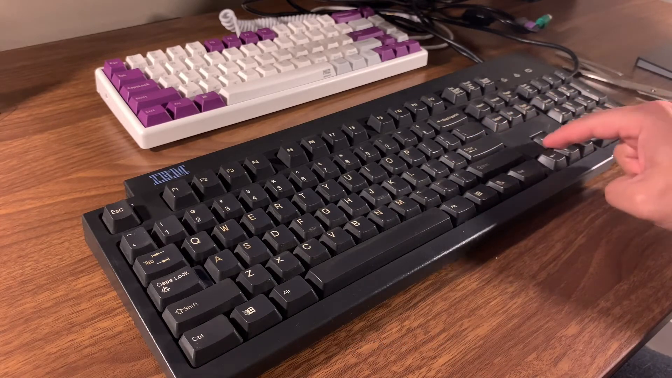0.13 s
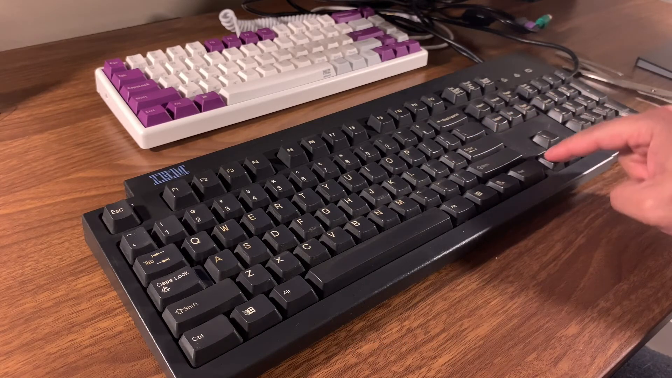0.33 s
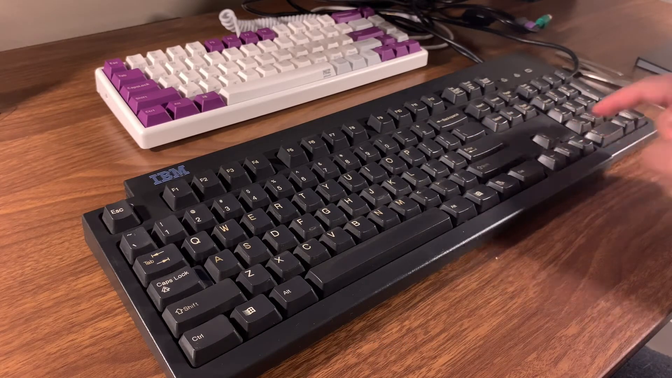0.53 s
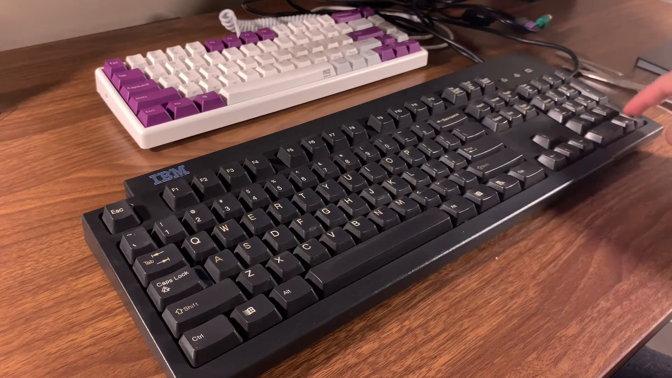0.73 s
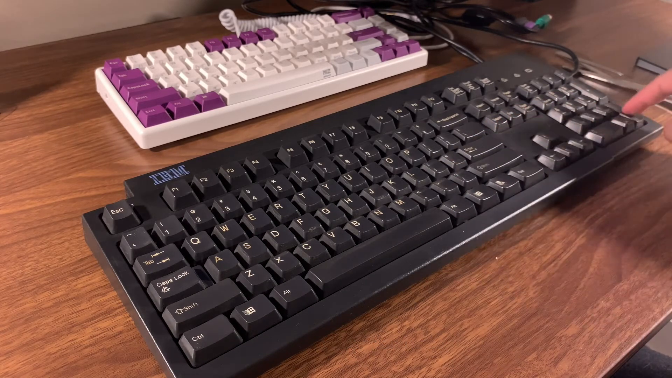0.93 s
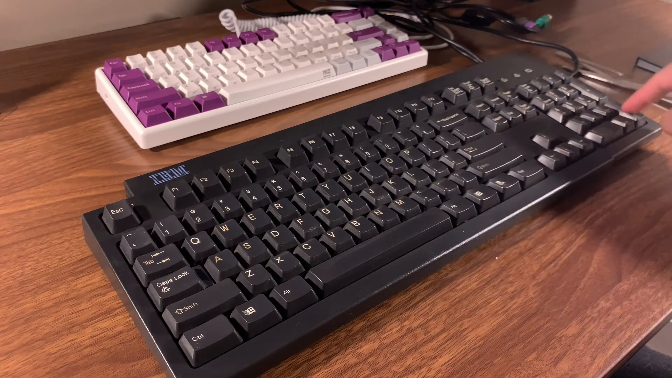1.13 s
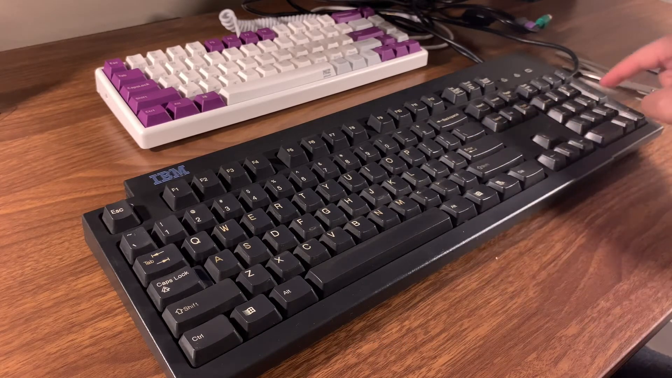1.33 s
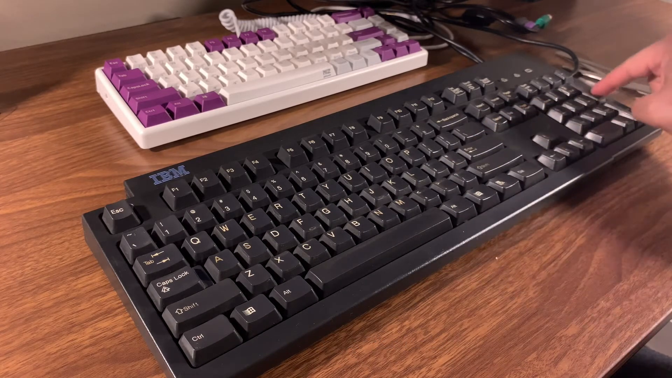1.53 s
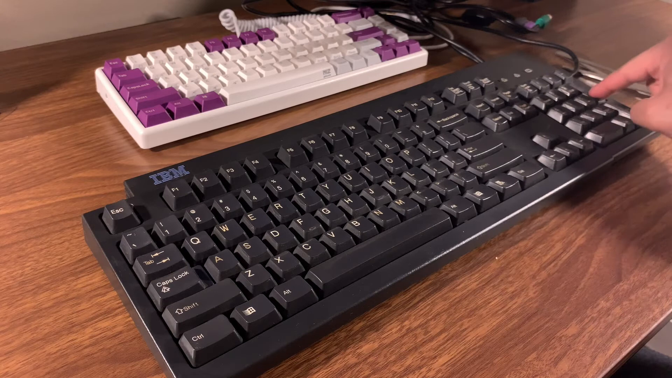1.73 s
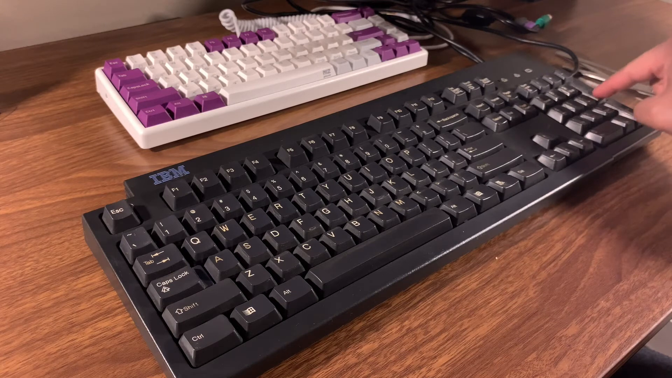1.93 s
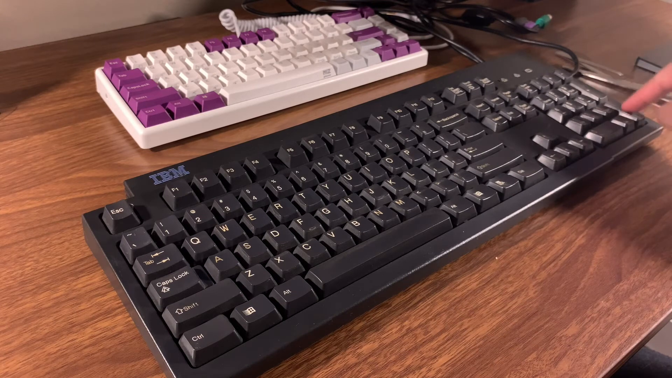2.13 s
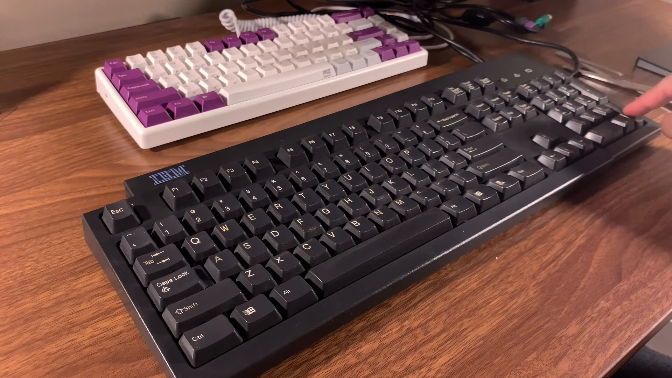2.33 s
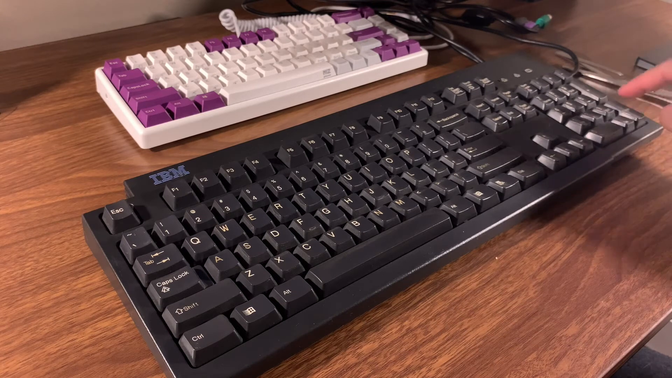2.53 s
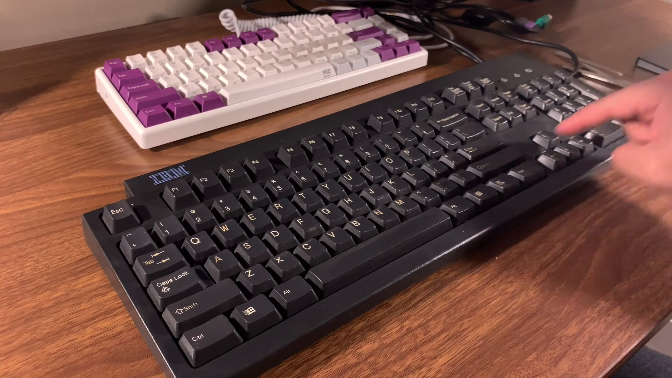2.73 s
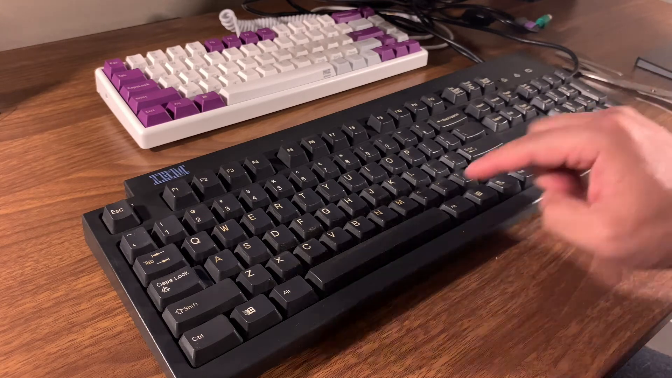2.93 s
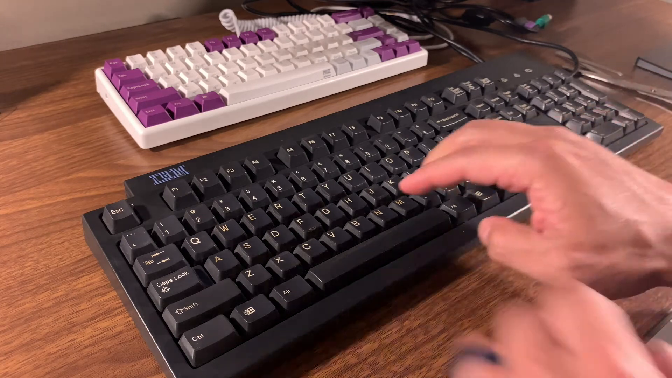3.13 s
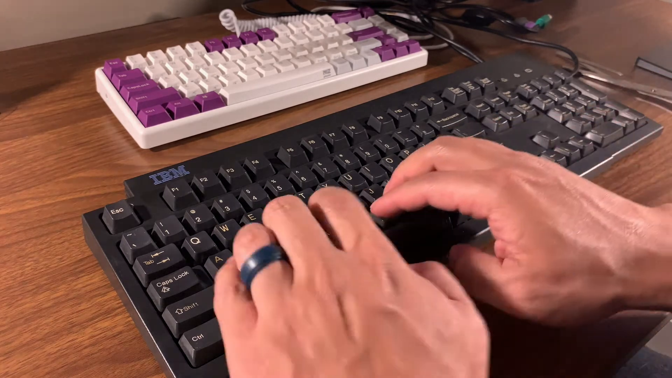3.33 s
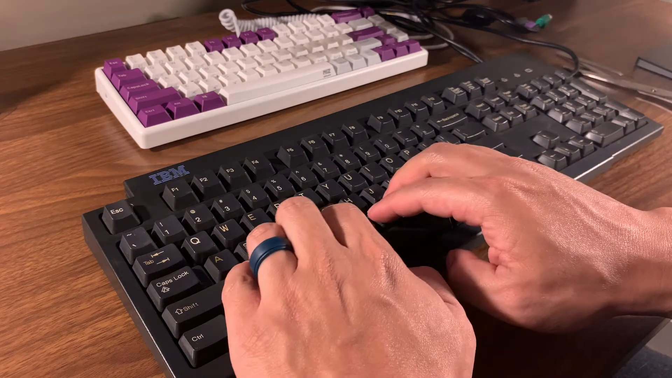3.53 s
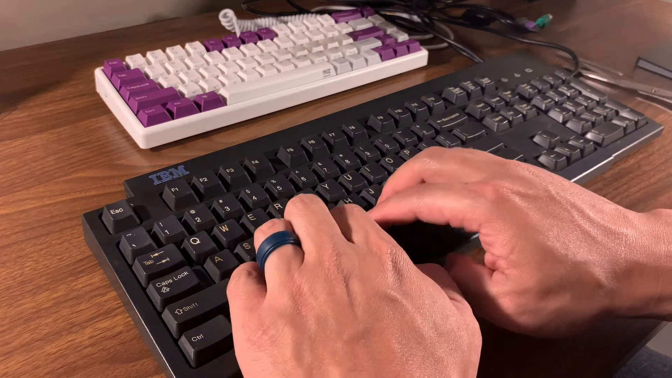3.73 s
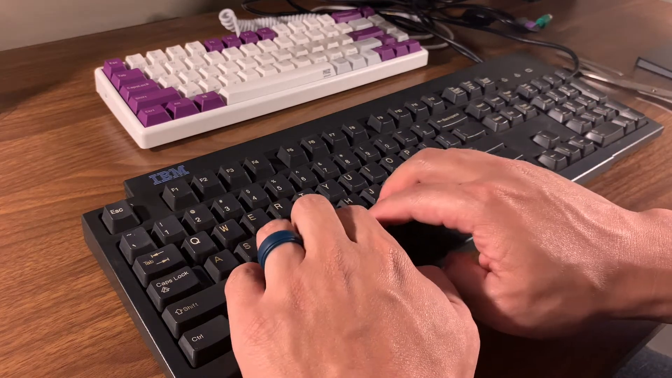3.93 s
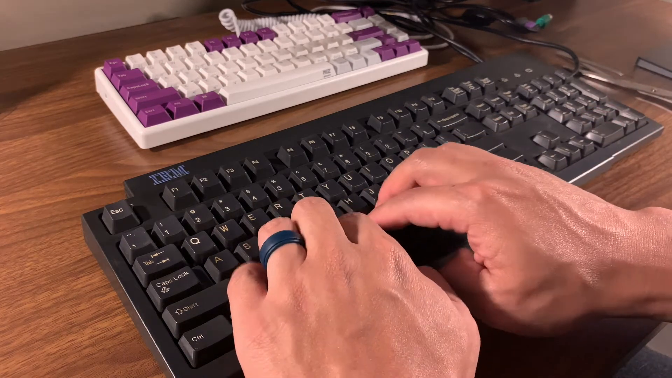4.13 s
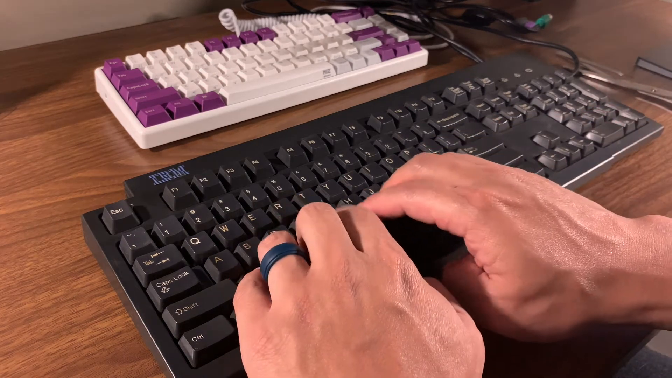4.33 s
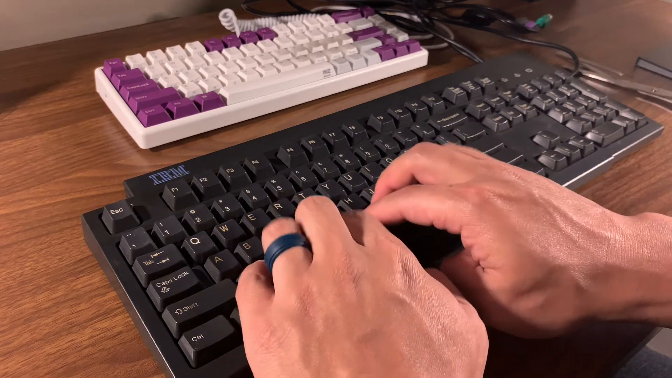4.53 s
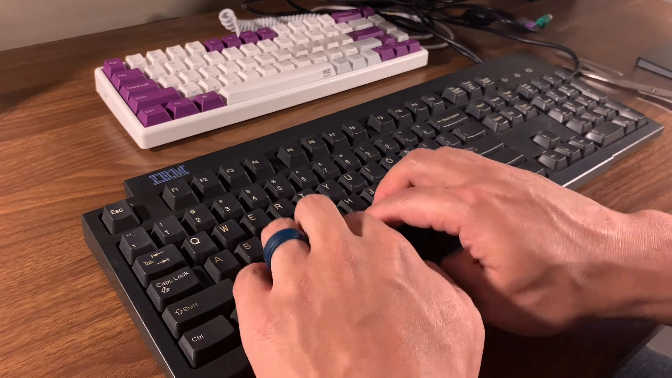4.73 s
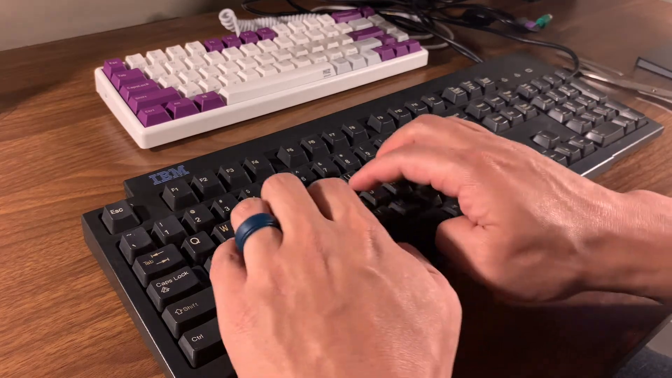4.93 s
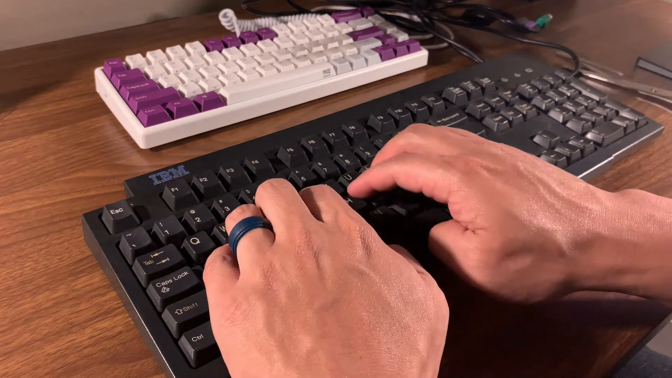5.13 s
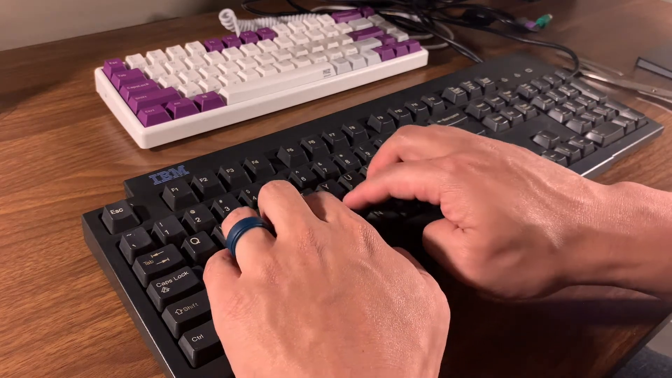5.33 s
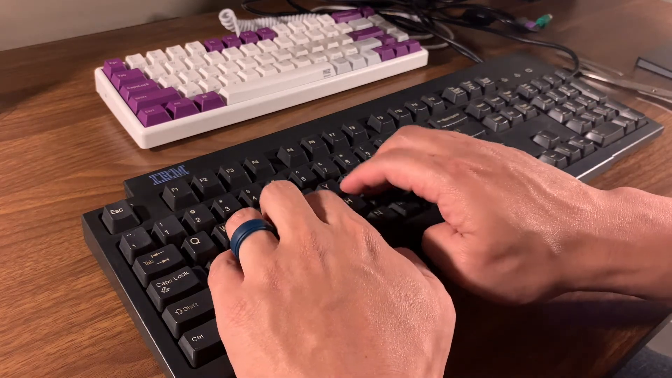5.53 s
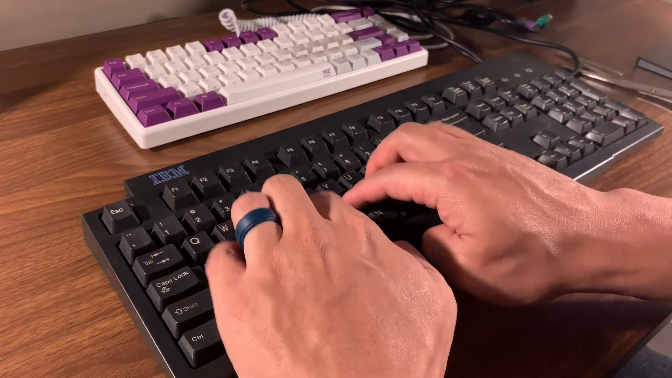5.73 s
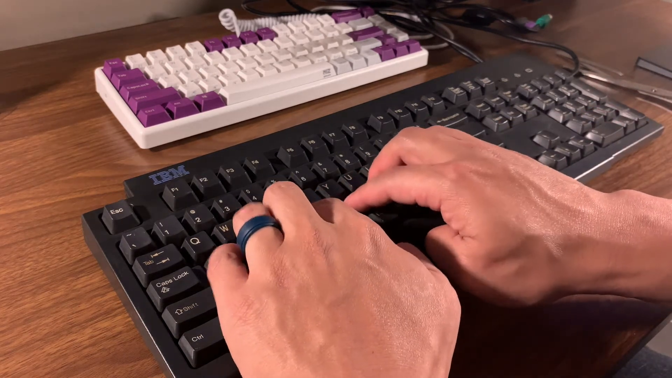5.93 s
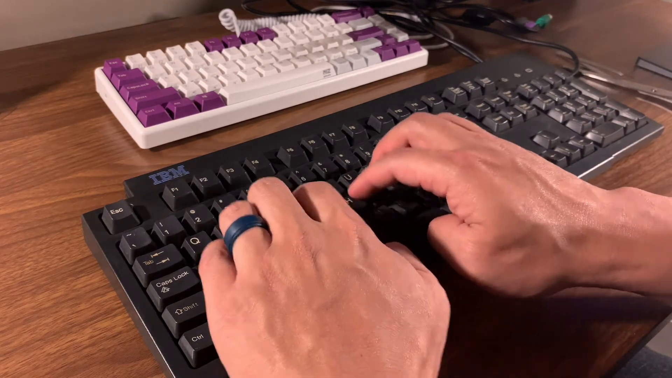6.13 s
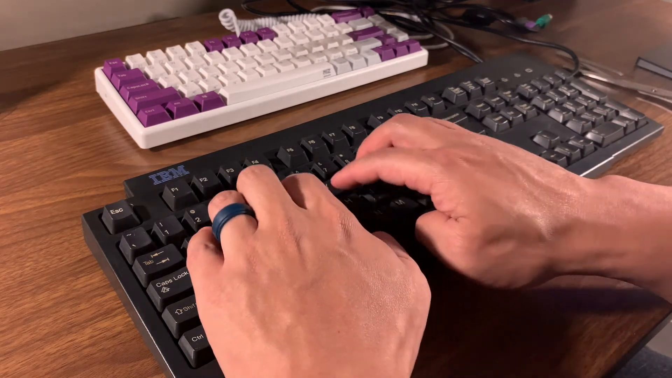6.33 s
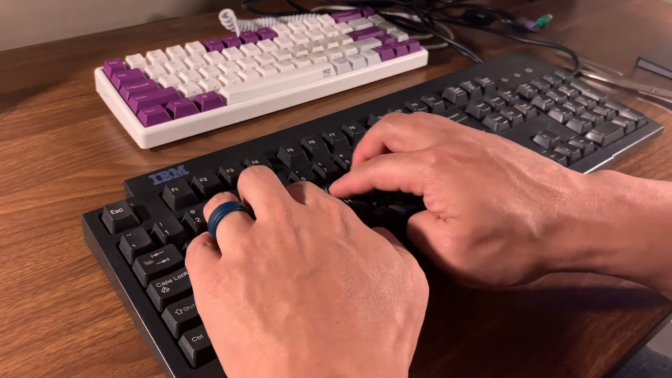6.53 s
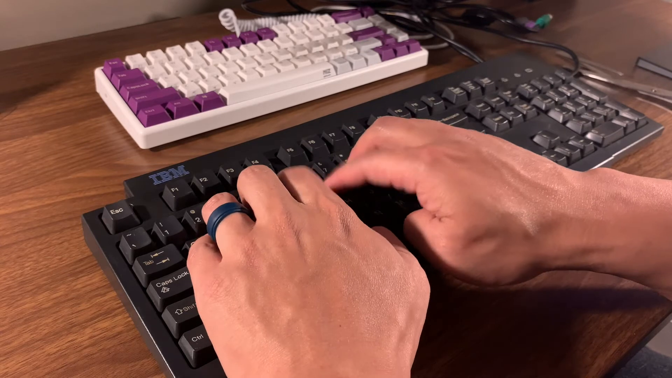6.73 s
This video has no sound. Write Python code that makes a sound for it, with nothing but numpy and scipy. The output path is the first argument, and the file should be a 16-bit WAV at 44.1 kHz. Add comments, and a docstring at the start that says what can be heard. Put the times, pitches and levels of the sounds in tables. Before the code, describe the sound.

Close, dry keyboard sounds: scattered loose key clacks at first, a near-silent gap, then fast, scratchy, hollow typing on a wooden desk in a quiet room.

```python
"""Over faint room noise and fingertips brushing caps, a finger presses single keys on a number pad;
from 2.7 s the letter keys sound, as both hands type, fast from about 4 s on.
Each key of the worn rubber-dome keyboard scrapes, clacks as its loose cap hits its stop twice, and rattles:
shaped noise bursts ring through the plastic and hollow case. Keys that bottom out thud the wooden desk:
decaying sines and low noise. A small, quiet room, heard close, adds sparse echoes."""
import sys
import numpy as np
from scipy import signal
from scipy.fft import rfft, irfft
from scipy.io import wavfile

SR = 44100
rng = np.random.default_rng(int(sys.argv[2]) if len(sys.argv) > 2 else 0)


def generate_wav(sig):
    """Save sig (samples, or channels by samples) to the path in sys.argv[1] as 16-bit PCM at SR."""
    pcm = np.round(np.clip(np.atleast_2d(sig).T, -1, 1) * 32767).astype(np.int16)
    wavfile.write(sys.argv[1], SR, pcm)


N = 302967

HANDS_MOVE_S = 2.7  # number pad before, letter keys after
USUAL_DB, USUAL_HZ = -40, 3000  # reference blow and cap pitch
LEAD = 64  # samples of silence before a burst
AGE_S = np.maximum(np.arange(2048) - LEAD, 0) / SR
CLICK_SIZE = np.sqrt(.005 * SR)  # 0 dB: energy of 5 ms at rms one


def amp(db):
    """dB to amplitude factor."""
    return 10 ** (np.asarray(db) / 20)


def unit(x):
    """Scales a sound to an energy of one."""
    return x / np.sqrt(np.sum(x ** 2) + 1e-20)


def read(points, hz):
    """Reads a table on a log-frequency axis."""
    f, value = np.transpose(points)
    return np.interp(np.log(hz + 1), np.log(f + 1), value)


def add(mix, s, sound):
    """Lays a sound into the mix at time s."""
    part = mix[max(round(s * SR), 0):][:len(sound)]
    part += sound[:len(part)]


def coloured(x, points):
    """Filters a sound by a level table, in the frequency domain."""
    gain = amp(read(points, np.fft.rfftfreq(len(x), 1 / SR)))
    return irfft(rfft(x) * gain, len(x))


def band(x, low_hz, high_hz):
    """A causal band-pass."""
    edges_hz = np.clip([low_hz, high_hz], 10, SR / 2 - 100)
    return signal.sosfilt(signal.butter(2, edges_hz, "band", fs=SR, output="sos"), x + 1e-18)


def resonate(x, hz, width_hz):
    """One resonance with a gain of about one at its centre."""
    r = np.exp(-np.pi * width_hz / SR)
    turn = np.cos(2 * np.pi * hz / SR)
    return signal.lfilter([1 - r, 0, r - 1], [1, -2 * r * turn, r * r], x + 1e-18)


def fading(x, seconds):
    """The strength of a sound, left to die away."""
    r = np.exp(-1 / (seconds * SR))
    return np.sqrt(signal.lfilter([1 - r], [1, -r], x ** 2) + 1e-20)


def grains(colour, per_s, spread_db, length_s):
    """A stream of tiny noise clicks of uneven size, with an rms of one."""
    size = amp(spread_db * np.minimum(rng.exponential(1, N), 3))
    clicks = (rng.random(N) < per_s / SR) * size
    flutter = signal.lfilter([1], [1, -np.exp(-1 / (length_s * SR))], clicks)
    return np.sqrt(N) * unit(coloured(flutter * rng.standard_normal(N), colour))


# still air, spectrum: f/Hz, relative density/dB
AIR_COLOUR = [(20, -8), (65, 0), (150, -13), (280, -15), (450, -25), (2700, -27), (5700, -32), (10000, -30),
              (16000, -40)]
AIR_DB = -79.5  # rms


def air():
    """The faint steady noise of the room: coloured noise."""
    return amp(AIR_DB) * np.sqrt(N) * unit(coloured(rng.standard_normal(N), AIR_COLOUR))


# fingertips on the caps: t/s, rms level/dB
BRUSH_LEVEL = [(0, -73), (0.199, -76), (.28, -100), (2.8, -100), (2.87, -69.5), (3.12, -99.5), (3.64, -96),
               (3.71, -67.5), (3.85, -67.5), (4.1, -67), (4.2, -81)]
# their spectrum: f/Hz, relative density/dB
BRUSH_COLOUR = [(300, 3.5), (1500, 2.5), (5000, -1), (9500, -1.5), (14500, -19), (16000, -19)]


def brush():
    """Skin slips over the textured caps in tiny jerks."""
    level_db = np.interp(np.arange(N) / SR, *np.transpose(BRUSH_LEVEL))
    return amp(level_db) * grains(BRUSH_COLOUR, per_s=700, spread_db=8.0, length_s=0.0018)


# echo decay: f/Hz, t60/s
ROOM_T60 = [(200, .35), (1500, .45), (3800, .52), (7000, .44), (15000, .25)]
# echo strength: f/Hz, level/dB
ROOM_DB = [(200, 1), (650, -16), (1500, -13), (2600, -16.5), (3700, -13), (5000, -18), (7000, -12),
           (15000, -21)]


def room(x):
    """Sparse echoes from nearby walls, each band dying at its own speed."""
    late = np.arange(SR) > .007 * SR
    taps = rng.choice([-1., 1.], SR) * (rng.random(SR) < 3000 / SR) * late
    hz, t, z = signal.stft(taps, SR, nperseg=256)
    decay = amp(-60 * t / read(ROOM_T60, hz)[:, None])
    decay *= amp(read(ROOM_DB, hz))[:, None] / np.sqrt(np.mean(decay ** 2, axis=1, keepdims=True))
    tail = signal.istft(z * decay, SR, nperseg=256)[1] / np.linalg.norm(taps)
    return signal.fftconvolve(x, tail)[:N]


# other fingers jostle their keys: start t/s, end t/s, mean cap level/dB before the area gain
SPELLS = [(0, .21, -67), (.78, 1.06, -53.5), (1.38, 1.909, -61), (3.88, 4.003, -57.5), (4.09, 4.576, -55.5),
          (5.24, 5.54, -47.5), (5.54, 5.95, -45.5), (6.28, 6.45, -58), (6.0, 6.1, -56), (6.5, 6.83, -47.5)]
JOSTLES_PER_S = 48
JOSTLE_HZ, JOSTLE_SPREAD_OCTAVES = 2650, 0.25  # cap pitch
JOSTLE_SPREAD_DB, JOSTLE_CASE_DB = 4, -1.5  # spread of force; case knock over cap clack


def jostles():
    """Light contacts at uneven moments fill each spell."""
    slots = np.arange(N * JOSTLES_PER_S // SR)
    times_s = (slots + rng.random(len(slots))) / JOSTLES_PER_S
    rows = []
    for s, (force, pitch) in zip(times_s, rng.standard_normal((len(slots), 2))):
        cap_hz = JOSTLE_HZ * 2 ** (JOSTLE_SPREAD_OCTAVES * pitch)
        for start_s, end_s, db in SPELLS:
            if start_s <= s < end_s:
                cap_db = db + JOSTLE_SPREAD_DB * force
                rows.append((s, cap_db, cap_hz, cap_db + JOSTLE_CASE_DB))
    return rows


# key clacks: t/s, cap level/dB, cap f/Hz, case level/dB, rebound level/dB re first contact
# (cap and case levels before the area gain)
CLACKS = [(0.063, -54.5, 1840, -60, -5), (0.09, -57.5, 1820, -54.5, -21), (0.185, -61, 1950, -48.5, -24),
          (0.2862, -61.5, 1890, -56, 0), (0.31, -45.5, 1840, -54, -17), (0.344, -44.5, 1760, -64, -14),
          (0.388, -61.5, 2070, -59.5, 10), (0.7066, -28, 2720, -38, -29), (0.756, -45, 2860, -59.0, -16),
          (0.8033, -36, 4070, -39, -3), (0.8469, -37.5, 3880, -46.5, -3), (0.8622, -31, 3950, -44.5, -1),
          (0.9076, -38.5, 3780, -58, -5.5), (0.9676, -34.5, 4070, -42, 3), (1.0029, -39.5, 3940, -56, -7),
          (1.1182, -32.5, 3900, -40.5, 2), (1.1302, -34, 3860, -42, -8), (1.176, -45, 3810, -59, -22),
          (1.3498, -40.5, 1870, -35, -9), (1.365, -47, 2290, -41, -11), (1.3762, -51, 2760, -43.5, -12),
          (1.4355, -49.5, 3050, -51, -17), (1.4533, -53.5, 2560, -44.5, -19), (1.471, -51, 3370, -59, -23),
          (1.496, -57, 3100, -48, -5), (1.516, -61, 2350, -51, -4), (1.568, -66, 1810, -46.5, -14),
          (1.595, -53, 3770, -46, 3), (1.6075, -39.5, 4330, -39.5, -21), (1.6754, -46, 1790, -40.5, -5),
          (1.7705, -51.5, 3050, -50, -24), (1.7891, -37.5, 3170, -40.5, -4.5),
          (1.84, -48.5, 2700, -44.5, -10), (1.9233, -50, 3100, -46, -22), (1.9344, -41.5, 2580, -41.5, -1),
          (2.1151, -31, 3850, -41.5, -8), (2.1554, -42.5, 4100, -53.5, -1),
          (2.2193, -36.0, 3850, -42.5, -4), (2.2758, -38.5, 3900, -39.5, -15),
          (2.4078, -36, 3980, -45, -14), (2.42, -36, 4170, -47.5, -4), (2.8817, -54.5, 1810, -52.5, -26),
          (3.415, -64.0, 1990, -66, -17), (3.4447, -66.5, 2800, -60.5, -17),
          (3.4727, -54.5, 2560, -55.5, -15), (3.529, -46.5, 3140, -62, -16), (3.563, -43.5, 1700, -57, -17),
          (3.6686, -60.0, 1810, -56.5, -11), (3.6987, -52, 3250, -49, -21), (3.8512, -61.0, 3700, -59, -14),
          (3.889, -65, 1810, -58, -16), (3.923, -53.5, 2620, -54, -10), (3.982, -56.5, 2560, -59, 1),
          (4.097, -50, 1810, -50, 3), (4.1117, -42.5, 1810, -36, -3), (4.1374, -43.5, 2610, -42, 1.5),
          (4.177, -36.5, 3300, -43, -19), (4.224, -29.5, 2290, -36.5, -17), (4.25, -53, 1980, -41, -25),
          (4.2725, -43, 2170, -61, -14), (4.3375, -28.5, 3290, -35.5, -22), (4.3872, -41, 3460, -53, -13),
          (4.4098, -41.5, 1770, -36.5, -7), (4.45, -40.5, 2730, -38, -2.5), (4.4647, -38, 3350, -37, -8),
          (4.5154, -39.0, 2650, -40, -0.5), (4.53, -35, 2550, -40.5, -7), (4.6096, -29, 3770, -37, -29),
          (4.66, -40.5, 3620, -52, -25), (4.7441, -44.5, 2650, -37.0, -2), (4.762, -50, 2890, -43, 2),
          (4.7723, -29, 2680, -39, -5.5), (4.7851, -29.5, 3460, -34.5, -3.5), (4.809, -37.5, 2720, -42, -4),
          (5.024, -46.5, 2560, -57, 3.5), (5.089, -55, 2350, -52.5, -23), (5.2031, -46.5, 2700, -56, -9),
          (5.2383, -37.5, 3630, -37, -10.5), (5.272, -50, 2750, -45, -22), (5.3243, -51.5, 1810, -44.5, -2),
          (5.363, -38, 2510, -36.5, -7), (5.3868, -38, 3300, -41.0, 0.5), (5.417, -42, 1810, -46, -27),
          (5.445, -30.0, 2660, -37, -27), (5.4769, -32.5, 3400, -40, -4), (5.4885, -39, 2900, -49, -11),
          (5.523, -29, 3130, -44, -20), (5.5388, -40, 2250, -44.5, -13), (5.57, -36.5, 2980, -46.0, -12),
          (5.5912, -30.5, 2240, -43.5, -12), (5.6039, -44, 2690, -47, -4), (5.6183, -44, 1940, -49, 0),
          (5.64, -43.5, 2240, -45, 2), (5.6734, -42, 1810, -35.5, -8), (5.713, -30, 3640, -46.0, -23),
          (5.7251, -31.5, 2930, -34.5, -5.5), (5.7393, -34.5, 2920, -40, -27),
          (5.7619, -32.5, 2070, -32.5, -12), (5.8099, -33.5, 3030, -44, -26), (5.8463, -38, 1810, -47, -6),
          (5.8639, -37, 2090, -45, -5), (5.8867, -32, 2900, -42, -4.5), (5.921, -36.5, 2580, -45, -6),
          (6.0095, -43, 2980, -42.5, 2), (6.038, -38.5, 2200, -38.5, -21), (6.0635, -34.5, 2190, -41, -22),
          (6.09, -41.5, 3420, -53, -23), (6.264, -39.5, 1960, -50.5, -15), (6.297, -47.5, 2640, -49.5, 3),
          (6.3162, -43, 2790, -53, -21), (6.368, -55, 2690, -54.5, 5), (6.3909, -50, 1820, -45.0, -15),
          (6.455, -34, 2960, -38, -11), (6.4701, -34, 3370, -39, -24), (6.5046, -31.5, 3640, -39, -23),
          (6.5391, -40, 2950, -45, -4), (6.5662, -35.0, 2410, -39.5, -4.5), (6.5767, -35.5, 1800, -41, -17),
          (6.6403, -42.0, 2400, -39.5, -10), (6.6584, -37.5, 2000, -57, -24), (6.699, -47, 2860, -46, -6),
          (6.7438, -40.5, 2910, -43.5, 3), (6.7593, -48, 1790, -45, 1), (6.8002, -37.5, 1840, -44, 3.5),
          (6.8193, -49, 2640, -50, -17), (6.8383, -40, 3530, -48, -17)]
REBOUND_S, REBOUND_SCATTER_S = .0078, .0008


def rebounds():
    """Each clack is two contacts: the loose cap hits its stop, bounces and hits it again."""
    rows = []
    for s, cap_db, cap_hz, case_db, rebound_db in CLACKS:
        again_s = s + REBOUND_S + REBOUND_SCATTER_S * rng.standard_normal()
        rows.append((s, cap_db, cap_hz, case_db))
        rows.append((again_s, cap_db + rebound_db, cap_hz, case_db + rebound_db))
    return rows


def with_ticks(rows, tick_db, cap_slope, case_slope, octave_db):
    """Gives each contact its edge tick, which grows with the force of the blow and the pitch of the cap."""
    s, cap_db, cap_hz, case_db = np.transpose(rows)
    force_db = cap_slope * (cap_db - USUAL_DB) + case_slope * (case_db - USUAL_DB)
    pitch_db = octave_db * np.log2(cap_hz / USUAL_HZ)
    return np.transpose([s, cap_db, cap_hz, case_db, tick_db + force_db + pitch_db])


def burst(colour, rise_s, decay_s, chatter):
    """The crowded modes of a plastic part: a sudden start, a quick decay, uneven as the part chatters."""
    shake = np.repeat(rng.standard_normal(len(AGE_S) // 32), 32)
    envelope = (1 - np.exp(-AGE_S / rise_s)) * np.exp(-AGE_S / decay_s + chatter * shake)
    return coloured(rng.standard_normal(len(AGE_S)) * envelope, colour)


def contact(colour, looseness, cap_db, cap_hz, case_db, tick_db):
    """The cap rings at its pitch, its edge ticks, the case answers more slowly; loose caps chatter longer."""
    # light touches start more softly than hard blows
    rise_s = .0002 * looseness * amp(-.25 * (cap_db + 33))
    clack = burst(colour, rise_s, decay_s=0.003 * looseness, chatter=0.34)
    pitched = resonate(burst(colour, rise_s, decay_s=0.0021, chatter=0.34), cap_hz, 200)
    cap = unit(band(clack, 1600, 4700)) + 1.1 * unit(pitched)

    knock = burst(colour, rise_s=0.00091, decay_s=0.0055, chatter=0.22)
    # the case knock's pitch varies at random from contact to contact
    panel_hz = 1180 * 2 ** (.45 * rng.standard_normal())
    case = unit(band(knock, 520, 1750)) + 0.52 * unit(resonate(knock, panel_hz, 100))
    hollow = band(burst(colour, rise_s=0.0042, decay_s=0.01, chatter=0.15), 300, 680)
    shell = unit(unit(case) + 0.42 * unit(hollow))

    edge = burst(colour, rise_s=8.5 * rise_s, decay_s=0.0025 * looseness, chatter=0.24)
    tick = band(band(edge, 4300, 19500), 3700, 19500)
    return CLICK_SIZE * (amp(cap_db) * unit(cap) + amp(case_db) * shell + amp(tick_db) * unit(tick))


def rattle(blows, per_s, settle_s, width_at_1khz_hz, count):
    """Loose parts nearby go on shaking; each pings at its own pitch, as hard as the blows excite that octave."""
    out = np.zeros(N)
    for octave_hz in 450 * 2 ** np.arange(5):
        pings = np.zeros(N)
        for hz in octave_hz * 2 ** ((np.arange(count) + rng.random(count)) / count):
            hits = np.zeros(N)
            at = rng.integers(0, N, round(per_s * N / SR))
            hits[at] = rng.standard_normal(len(at))
            pings += unit(resonate(hits, hz, width_at_1khz_hz * np.sqrt(hz / 1000)))
        strength = fading(band(blows, octave_hz, 2 * octave_hz), settle_s)
        out += strength * np.sqrt(N) * unit(pings)
    return out


def keys(rows, colour, modes, looseness, slide_db, rattle_db, level_db):
    """All contacts in one area of the keyboard, rung through the plastic there."""
    blows = np.zeros(N)
    for s, *blow in rows:
        add(blows, s - LEAD / SR, contact(colour, looseness, *blow))
    # the dirty stem scrapes in its sleeve just before contact (time-reversed decay);
    capped = np.clip(blows, -amp(-42.5), amp(-41))
    travel = fading(capped[::-1], seconds=0.0043)[::-1]
    slide = amp(slide_db) * travel * grains(colour, per_s=900, spread_db=6.5, length_s=0.0016)
    shaking = rattle(blows, per_s=45, settle_s=0.026, width_at_1khz_hz=99, count=7)
    direct = blows + slide + amp(rattle_db) * shaking
    ringing = sum(amp(db) * resonate(direct, hz, width_hz) for hz, width_hz, db in modes)
    return amp(level_db) * (direct + ringing)


# burst spectrum at the number pad: f/Hz, relative density/dB
PAD_COLOUR = [(150, -36), (250, 0.5), (580, 2.5), (1370, -6), (1840, -3.5), (2050, -6.5), (2620, -4.5),
              (3530, -6), (3920, -2.5), (4750, -12), (6990, -16.5), (10300, -22.5), (15700, -37.5),
              (16500, -47)]
# cap, case and back-plate modes there: f/Hz, width/Hz, level/dB re dry click
PAD_MODES = [(386, 47, -5), (645, 1.8, -0.5), (650, 110, -15.5), (1550, 4, -7.5), (2670, 79, -7),
             (3540, 5.3, -1.5), (3710, 3.2, -3), (3800, 34, -7), (5160, 50, 1), (5310, 26, -16),
             (5750, 5, -5.5), (6010, 50, 2.5), (6970, 74, 6.5), (8285, 76, 1.5), (10700, 150, -4)]


def number_pad(rows):
    """Looser caps: longer chatter, softer starts, ticks that follow mostly the cap blow."""
    early = [row for row in rows if row[0] < HANDS_MOVE_S]
    ticked = with_ticks(early, tick_db=-44.0, cap_slope=1.26, case_slope=.1, octave_db=6.5)
    return keys(ticked, PAD_COLOUR, PAD_MODES, looseness=1.3,
                slide_db=-13.5, rattle_db=-14.0, level_db=-2.0)


# modes of the desk top under the number pad: nominal f/Hz, relative level/dB, t60/s
DESK_AT_PAD = [(106, -10, 0.34), (172, 1, 0.16), (250, 2, .04), (367, -7, 0.078)]
# the same under the letter keys: nominal f/Hz, relative level/dB, t60/s
DESK_AT_LETTERS = [(109.4, 0.5, 0.23), (141, -8.5, 0.062), (172, -3.5, 0.2), (267, -3.5, 0.052),
                   (365, -6, 0.076)]
# slow sway of the desk: nominal f/Hz, relative level/dB, t60/s
DESK_SWAY = [(27.2, -7.5, 1.9), (43.8, 2.5, 0.6), (62.7, -2.5, 0.6), (78.5, 2, 0.22)]
# pushes that reach the desk: t/s, thud level/dB before the trims in desk()
THUDS = [(0.091, -51), (0.314, -49.5), (0.394, -50.5), (0.72, -43), (0.865, -41.5), (0.97, -50),
         (1.025, -46), (1.125, -43.5), (1.363, -32), (1.423, -47), (1.523, -42), (1.694, -42),
         (1.846, -42.5), (1.929, -42), (2.132, -45.5), (2.405, -47.5), (3.928, -43), (3.996, -45.5),
         (4.114, -43), (4.232, -43), (4.275, -40.5), (4.354, -45.5), (4.412, -41), (4.454, -38),
         (4.559, -39), (4.623, -42.5), (4.745, -40), (4.812, -45.5), (5.197, -39.5), (5.238, -42.5),
         (5.323, -38.5), (5.494, -36.5), (5.559, -35), (5.643, -36.5), (5.77, -40), (5.841, -37),
         (5.913, -44.5), (6.04, -42), (6.396, -37), (6.478, -41), (6.576, -40), (6.651, -37.5),
         (6.737, -35.5), (6.799, -45)]
SWAY_DB, SWAY_SLOPE = -50, 0.085  # sway at a usual push; dB per dB of push, hardly more at a hard one
PRESS_TIME_S = np.arange(-.06, .1, 1 / SR)


def desk_blow(modes, rise_s, spread):
    """A soft push rings the desk; the mode pitches vary a little at random from push to push."""
    t = np.arange(SR) / SR
    ring = np.zeros(SR)
    for hz, db, t60_s in modes:
        varied_hz = hz * (1 + spread * rng.standard_normal())
        ring += amp(db - 60 * t / t60_s) * np.sin(2 * np.pi * varied_hz * t)
    return ring * (1 - np.exp(-t / rise_s))


def desk():
    """Keys that bottom out push the whole keyboard into the desk."""
    out = np.zeros(N)
    for s, thud_db in THUDS:
        top = DESK_AT_PAD if s < HANDS_MOVE_S else DESK_AT_LETTERS
        sway_db = SWAY_DB + SWAY_SLOPE * (thud_db - USUAL_DB)
        add(out, s, amp(thud_db - 3.0) * desk_blow(top, rise_s=0.0033, spread=.04))
        add(out, s, amp(sway_db) * desk_blow(DESK_SWAY, rise_s=0.0072, spread=.06))
        # the soft fingertip loads the key just before it bottoms out, and lets go more slowly
        grip = np.exp(-abs(PRESS_TIME_S) / np.where(PRESS_TIME_S < 0, .009, .022))
        press = band(band(rng.standard_normal(len(grip)) * grip, 50, 200), 50, 200)
        add(out, s + PRESS_TIME_S[0], amp(thud_db - 1.0) * CLICK_SIZE * unit(press))
    return out


# burst spectrum at the letter keys: f/Hz, relative density/dB
LETTER_COLOUR = [(150, -1), (250, -5.5), (374, -1.5), (644, -2.5), (781, 1), (1320, -2.5), (3410, -3.5),
                 (4060, -6), (4920, -17.5), (6630, -20), (8330, -18.5), (11200, -26), (15100, -29.5),
                 (16500, -51.5)]
# cap, case and back-plate modes there: f/Hz, width/Hz, level/dB re dry click
LETTER_MODES = [(560, 58, -12.5), (775, 61, -29), (1143, 83, -7), (2092, 2.3, -1.5), (2720, 63, -14),
                (3200, 4.2, 3), (3515, 7.2, -3), (7180, 120, -12), (8800, 44, 3.5)]


def letter_keys(rows):
    """Tighter caps: shorter chatter, quicker starts, ticks that follow cap and case blows."""
    late = [row for row in rows if row[0] >= HANDS_MOVE_S]
    ticked = with_ticks(late, tick_db=-49.5, cap_slope=0.51, case_slope=0.89, octave_db=2)
    return keys(ticked, LETTER_COLOUR, LETTER_MODES, looseness=0.91,
                slide_db=-8.0, rattle_db=-17.5, level_db=-1.5)


DESK_IN_ROOM_DB = -5  # desk top into the room


def scene():
    """Number pad first, then the letter keys, on one desk in one room."""
    rows = rebounds() + jostles()
    keyboard = brush() + number_pad(rows) + letter_keys(rows)
    thuds = desk()
    echoes = room(keyboard + amp(DESK_IN_ROOM_DB) * thuds)
    return (air() + keyboard + thuds + echoes)[None]


EDGE_HZ = 16600


def record(dry):
    """The recorder's band limit: a linear-phase low-pass."""
    low_pass = signal.firwin(511, EDGE_HZ, window=("kaiser", 9), fs=SR)
    return signal.oaconvolve(dry, low_pass[None], "same")


dry = scene()
out = record(dry)
generate_wav(out)
```